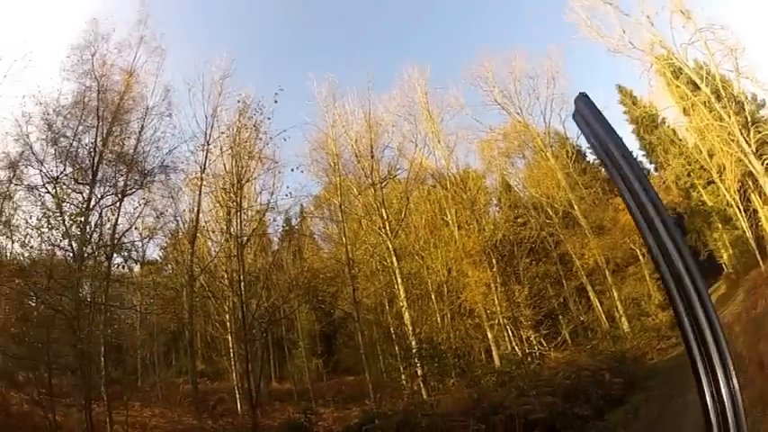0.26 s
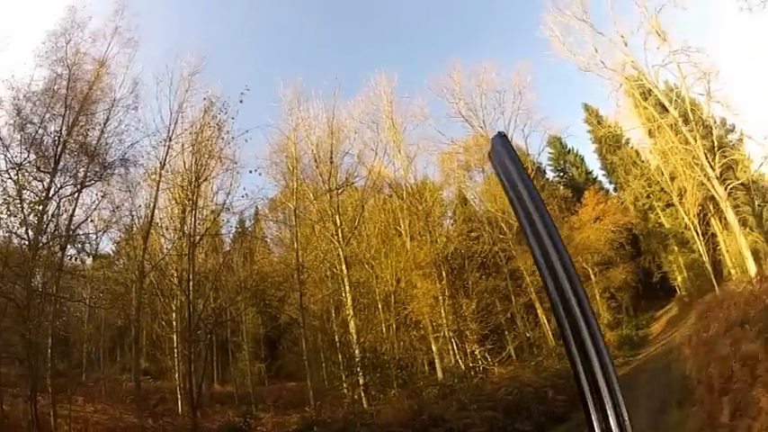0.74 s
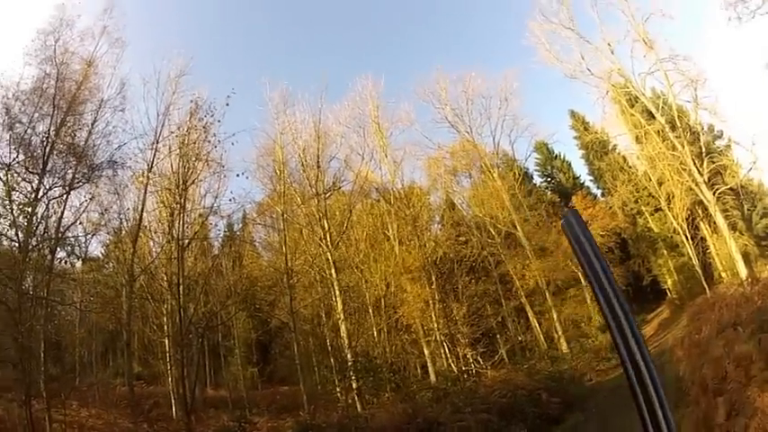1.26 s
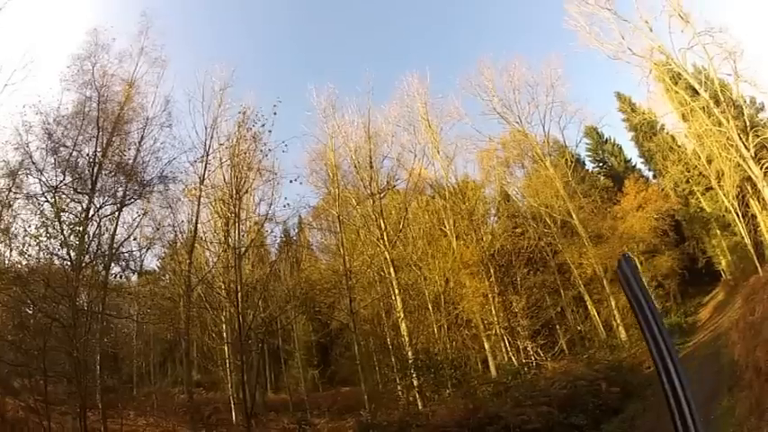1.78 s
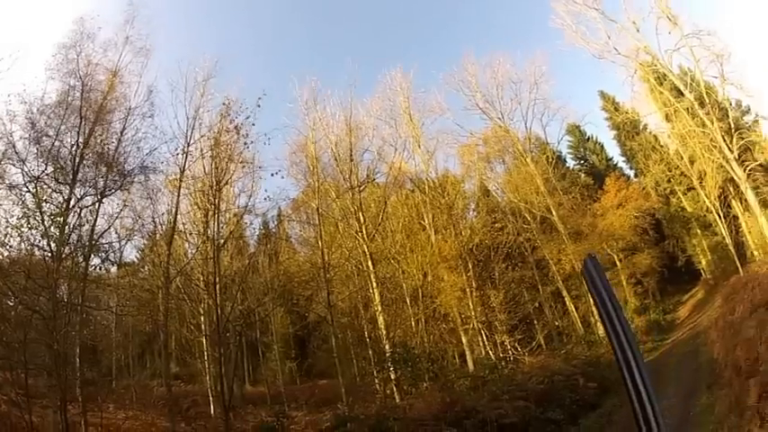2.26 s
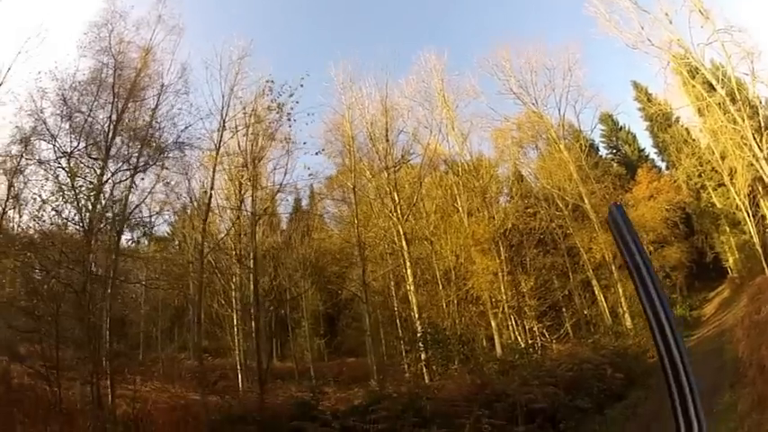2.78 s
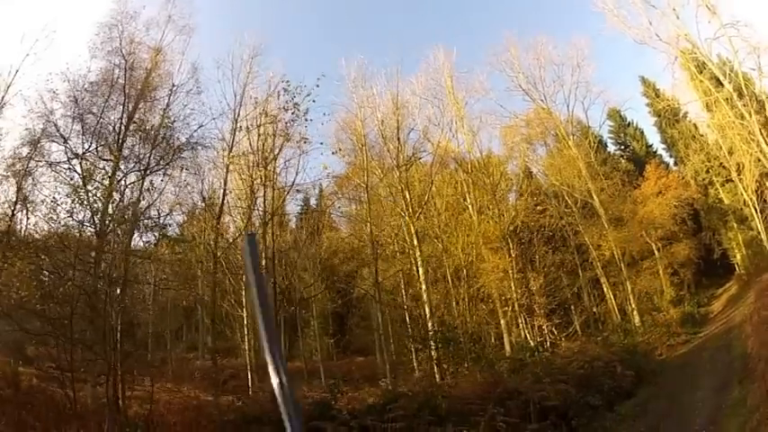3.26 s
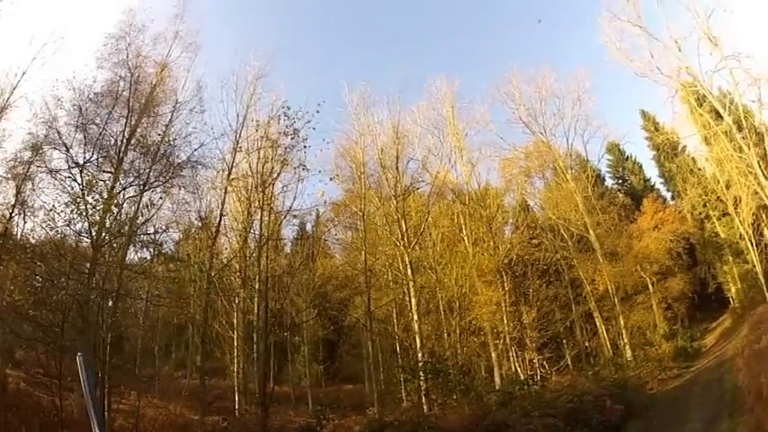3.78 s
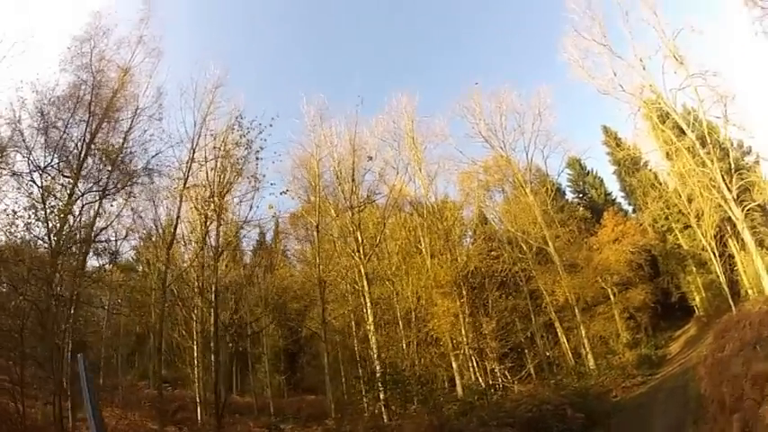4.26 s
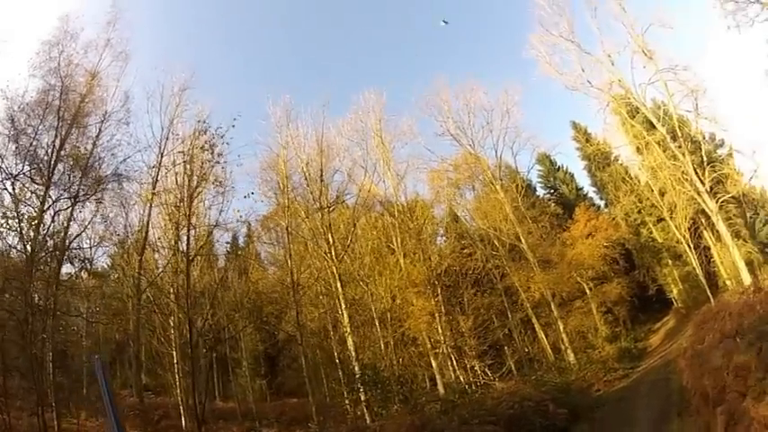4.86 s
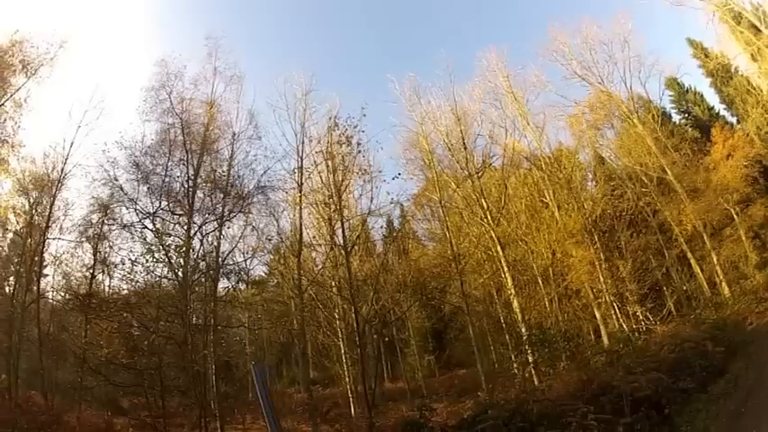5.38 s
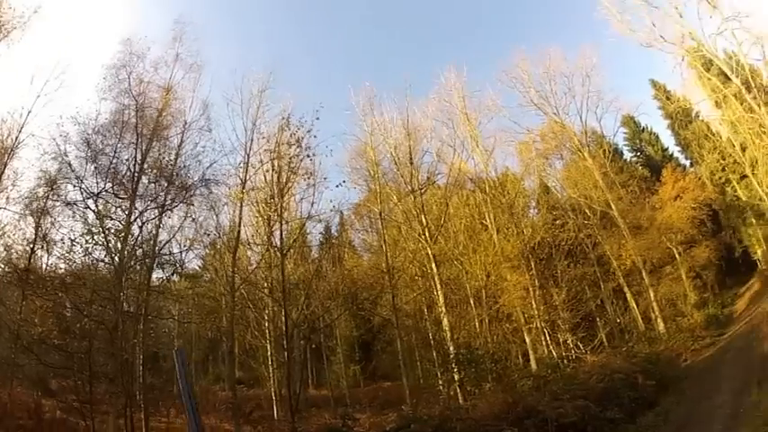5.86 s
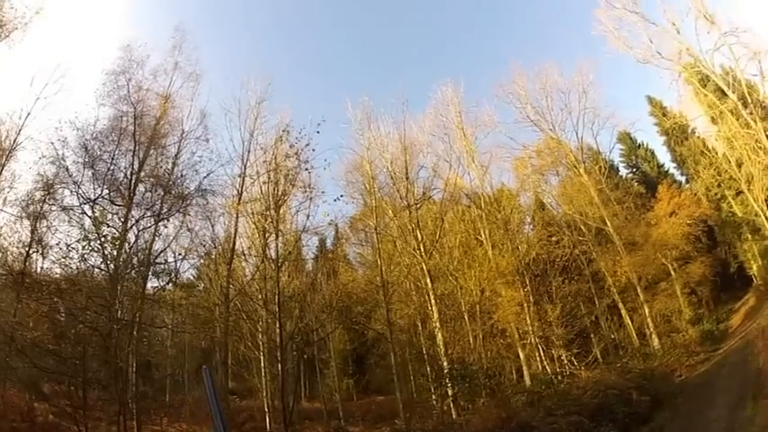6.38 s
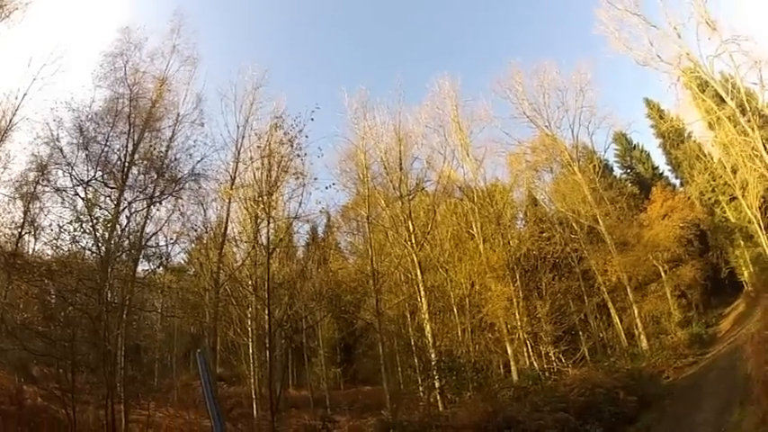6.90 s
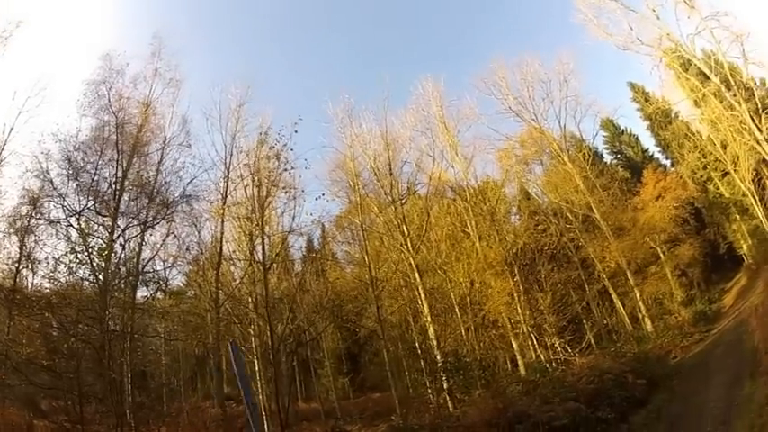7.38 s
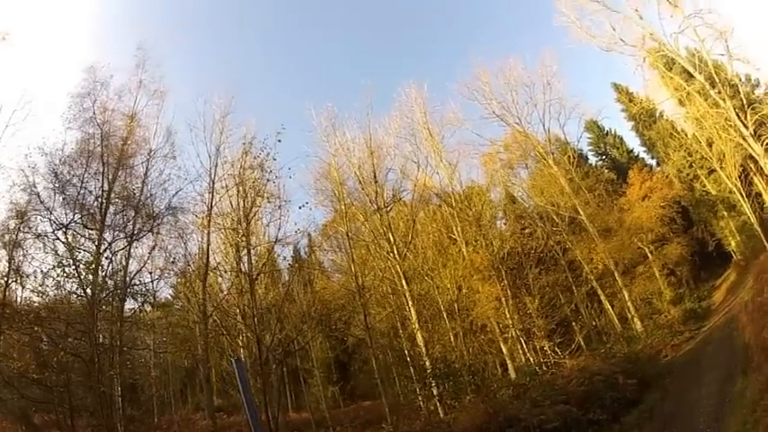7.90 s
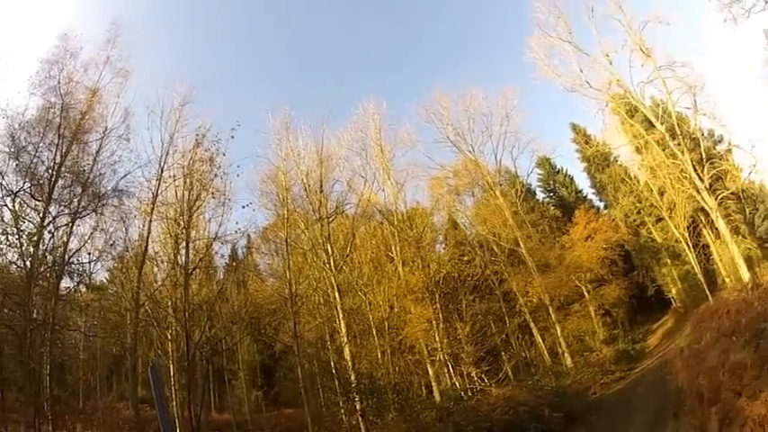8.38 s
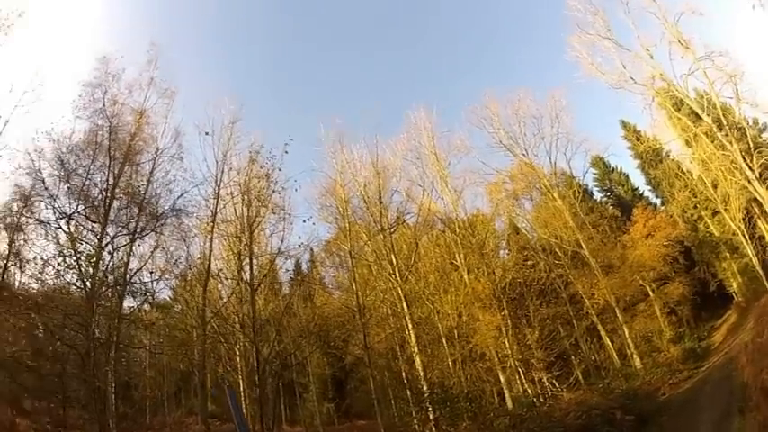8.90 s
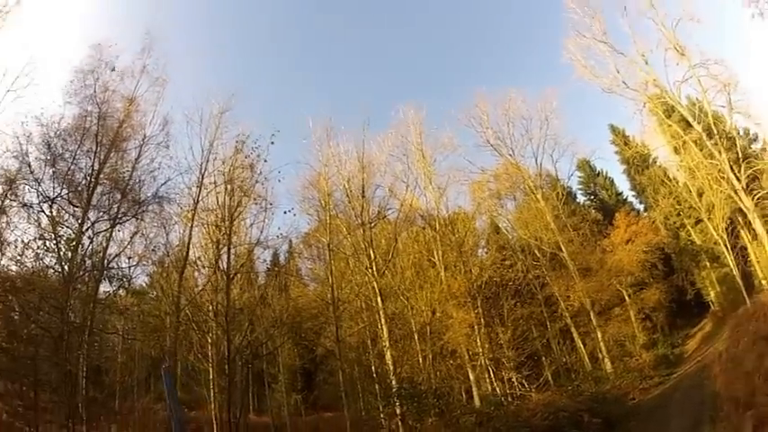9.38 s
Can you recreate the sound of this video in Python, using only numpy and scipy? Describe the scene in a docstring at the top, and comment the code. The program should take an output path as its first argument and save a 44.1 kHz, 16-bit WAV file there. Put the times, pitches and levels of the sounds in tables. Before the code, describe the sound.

Still woodland air, a low soft bed with slight hiss, nearly mono through a small cased camera on the shooter. Faint gun clicks from 0.7 to 1.5 s, with light cloth rustle. From 1.3 to 2.5 s a flushed pheasant gives eight raspy, resonant cackles, with a few faint distant birds. At 2.5 s a very close shotgun blast overloads the microphone: hard crack, boxy boom, short thump. A second follows at 3.2 s. Each throws a swelling scatter of echoes from trunks, then a low roll surging in patches and fading over several seconds. Harsh short clucks run from 4.1 to 6.4 s, with a brief wind bump at 4.6. Hard, ringing steel clicks open the gun around 6.0 and 6.2 s. Afterwards come tiny clicks, soft gusts at 7.5 and 9.0, rustling, and sparse far chirps and hoarse calls until about 9.7 s.

```python
"""Gun handled with small clicks; a pheasant cackles as it is flushed: uneven pulses and rasp in a resonant throat.
Two shotgun blasts overload a small cased camera: crack, boom and thump, then tree scatter and a long roll.
The bird clucks on in flight; the gun is opened with hard clicks: noise snaps over ringing steel modes.
Throughout: far birds as gliding sines, woodland air, wind gusts on the case and rustling clothes as shaped noise."""
import sys
import numpy as np
from scipy import signal
from scipy.fft import rfft, irfft, next_fast_len
from scipy.io import wavfile
from scipy.ndimage import uniform_filter1d

SR = 44100
rng = np.random.default_rng(int(sys.argv[2]) if len(sys.argv) > 2 else 0)


def write(x):
    x = np.atleast_2d(x).T
    wavfile.write(sys.argv[1], SR, np.round(np.clip(x, -1, 1) * 32767).astype(np.int16))


N = 425124
TIME = np.arange(N) / SR


def from_db(db):
    """Decibels to gain."""
    return 10 ** (np.asarray(db) / 20)


def rms_one(x):
    """Scale to unit power."""
    return x / np.sqrt(np.mean(x ** 2) + 1e-20)


def coloured(x, colour):
    """Filter by a (hz, db) curve, interpolated over log frequency; rms 1."""
    hz, db = np.transpose(colour)
    size = next_fast_len(len(x), real=True)
    bins_hz = np.maximum(np.arange(size // 2 + 1) * SR / size, 1)
    gain = from_db(np.interp(np.log(bins_hz), np.log(hz), db))
    filtered = irfft(rfft(x, size) * gain, size)
    return rms_one(filtered[:len(x)])


def band(x, low_hz, high_hz):
    """Causal band-pass."""
    edges_hz = [low_hz, min(high_hz, SR / 2 - 1000)]
    sos = signal.butter(2, edges_hz, "band", fs=SR, output="sos")
    return signal.sosfilt(sos, x + 1e-18)


def resonate(x, resonances):
    """Parallel two-pole resonances: (hz, width_hz, db)."""
    out = 0
    for hz, width_hz, db in resonances:
        radius = np.exp(-np.pi * width_hz / SR)
        poles = [1, -2 * radius * np.cos(2 * np.pi * hz / SR), radius * radius]
        peak = (1 - radius * radius) / 2 * signal.lfilter([1, 0, -1], poles, x + 1e-18)
        out = out + from_db(db) * peak
    return out


def decay(age_s, t60_s):
    """Unit envelope: starts at age 0, down 60 dB at t60."""
    return (age_s >= 0) * np.exp(-np.log(1000) * np.clip(age_s / t60_s, 0, 10))


def ring(age_s, hz, t60_s):
    """One struck mode: a decaying sine."""
    return np.sin(2 * np.pi * hz * age_s) * decay(age_s, t60_s)


def add(out, start_s, sound):
    """Mix a short sound in at start_s."""
    start = round(start_s * SR)
    out[start:start + len(sound)] += sound[:N - start]


def grains(per_s):
    """Random clicks of uneven size; rms 1."""
    return rms_one(rng.standard_normal(N) * (rng.random(N) < per_s / SR))


def swells(rows, t_s=TIME):
    """Gain of bell-shaped (centre_s, level_db, spread_s) swells whose powers add."""
    power = 0
    for centre_s, level_db, spread_s in rows:
        distance = np.minimum(abs(t_s - centre_s) / spread_s, 10)
        power = power + from_db(level_db) ** 2 * np.exp(-.5 * distance ** 2)
    return np.sqrt(power)


# shots: start_s, blast_db, boom_hz, crack_db, scatter_db, scatter_peak_delay_s, roll_db
SHOTS = [(2.4829, 4, 481, -2, -28.5, 0.22, -24), (3.1651, 4, 476, -2.5, -28, .17, -26)]
# second resonance of the camera case: mode_hz, mode_db, mode_t60_s
CASE_MODE = (840, -5, 0.016)


def blasts(boom_s=0.0038, boom_lowest_hz=230, crack_t60_s=.016, thump_hz=90, thump_db=-5, thump_t60_s=0.035,
           shudder_db=-19, shudder_t60_s=0.03):
    """The shock front cracks and sets the case booming for about two cycles, over a low thump."""
    out, age_s = np.zeros(N), TIME[:SR // 4]
    mode_hz, mode_db, mode_t60_s = CASE_MODE
    for start_s, blast_db, boom_hz, crack_db, *_ in SHOTS:
        # starts with a jump; the steep envelope cuts it off after about two cycles
        boom = np.sin(2 * np.pi * boom_hz * age_s + np.pi / 3) * np.exp(-(age_s / boom_s) ** 4)
        boom = band(from_db(blast_db) * boom, boom_lowest_hz, SR / 2)   # a small case cannot boom lower
        boom += from_db(mode_db) * ring(age_s, mode_hz, mode_t60_s)
        crack = rms_one(band(rng.standard_normal(len(age_s)), 460, 5500))
        crack *= from_db(crack_db) * decay(age_s, crack_t60_s)
        thump = from_db(thump_db) * ring(age_s, thump_hz, thump_t60_s)
        shudder = rms_one(band(rng.standard_normal(len(age_s)), 400, 1100))
        shudder *= from_db(shudder_db) * decay(age_s, shudder_t60_s)
        add(out, start_s, crack - boom + thump + shudder)
    return out


# scatter off trunks and twigs: hz, density_db (per Hz), extra_loss_db_per_s, first_echo_db
SCATTER = [(34.33, -3, -1.5, -10), (110, 12, 3.5, -17.5), (178, 1, 0.5, -26.5), (400, -14, -2.5, -3),
           (794, 0, -5.5, -8), (1120, 2, -5, -10), (1280, -6.5, -1.5, -4.5), (1690, -6, -2.5, -1),
           (2810, -6.5, 5, -3.5), (3400, -9, 3, -7), (4830, -13.5, 13, -0.5), (5940, -11, 15.5, -5.5)]
# resonances as the muzzle swings, one list a shot: hz, width_hz, peak_db
SCATTER_PEAKS = [
    [(1650, 100, 6), (2130, 290, 4), (2710, 340, -1), (3150, 150, -6), (3920, 220, -7.5), (4370, 210, -8.5)],
    [(1020, 340, -10.5), (1535, 71, 3), (2080, 140, 6), (2490, 220, 3.5), (3010, 54, 11.5), (4540, 260, -2)],
]


def scatter(echoes_per_s=8000, peaks_db=4.0, crest_db=1.0, hold_s=0.41, loss_db_per_decade=54):
    """Thousands of small echoes swell as the blast reaches the tree line; longer paths lose their treble."""
    hz, density_db, loss_db_per_s, first_db = np.transpose(SCATTER)
    edges_hz = np.geomspace(30, 7680, 17)
    out, age_s = np.zeros(N), TIME[:4 * SR]
    for (start_s, _, _, _, scatter_db, peak_s, _), peaks in zip(SHOTS, SCATTER_PEAKS):
        echoes = rfft(coloured(grains(echoes_per_s)[:len(age_s)], np.c_[hz, density_db]))
        bins_hz = np.arange(len(echoes)) * SR / len(age_s)
        # past the crest the level falls with path length
        fade_db = loss_db_per_decade * np.log10(1 + np.maximum(age_s - peak_s, 0) / hold_s)
        tail = 0
        for low_hz, high_hz in zip(edges_hz, edges_hz[1:]):
            centre_hz = np.sqrt(low_hz * high_hz)
            rise_db = np.interp(age_s, [0, peak_s], [np.interp(centre_hz, hz, first_db), crest_db])
            loss_db = np.interp(centre_hz, hz, loss_db_per_s) * np.minimum(age_s - peak_s, 1)
            band_echoes = irfft(echoes * (bins_hz >= low_hz) * (bins_hz < high_hz))
            tail = tail + from_db(scatter_db + rise_db - fade_db - loss_db) * band_echoes
        add(out, start_s, tail + from_db(peaks_db) * resonate(tail, peaks))
    return out


# colour of the roll: hz, level_db
ROLL_COLOUR = [(120, -34.5), (215, -13), (280, -5), (380, -2), (490, 1.5), (610, 0), (680, -8),
               (750, -23.5), (850, -18), (1200, -38), (2000, -59.5)]
# stands of trees that throw every shot back: delay_s, level_db (against the roll), spread_s
STANDS = [(.05, 1.5, 0.0091), (.105, 1, 0.019), (.172, 6, 0.034), (.236, 5, 0.014), (.35, -0.5, 0.033),
          (.406, 1.5, .01), (.455, -.5, .012), (.56, -1, 0.022), (.63, -5, .025), (1.92, -20, 0.18)]


def roll(echoes_per_s=8000, evenness=0.65, rise_s=0.083, hold_s=0.42, loss_db_per_decade=35.5,
         thin_below_hz=330, bass_fill_s=0.27):
    """Low echoes merge into a long roll that deepens, and surges as each stand of trees answers."""
    out = np.zeros(N)
    # holds while the blast crosses the clearing, then falls with path length
    fade_db = loss_db_per_decade * np.log10(np.hypot(1, TIME / hold_s))
    steady = (1 - np.exp(-TIME / rise_s)) * from_db(-fade_db)
    answer = np.hypot(steady, swells(STANDS))
    thin_share = np.exp(-TIME / bass_fill_s)
    for start_s, *_, roll_db in SHOTS:
        near = coloured(grains(echoes_per_s), ROLL_COLOUR)
        far = coloured(grains(echoes_per_s), ROLL_COLOUR)
        thin = rms_one(band(near, thin_below_hz, SR / 2))
        echoes = np.sqrt(thin_share) * thin + np.sqrt(1 - thin_share) * far
        # so many paths keep the power steady
        local_power = uniform_filter1d(echoes ** 2, size=1200) + 1e-6
        echoes /= local_power ** (evenness / 2)
        add(out, start_s, from_db(roll_db) * answer * rms_one(echoes))
    return out


# clicks of the gun handled and opened: start_s, force_db
GUN_CLICKS = [(0.746, -47.5), (0.773, -51), (.968, -49.5), (1.26, -49.5), (1.366, -48), (1.526, -47),
              (4.813, -49.5), (5.267, -50), (5.484, -55), (5.961, -55), (5.9734, -29.5), (5.985, -29.5),
              (6.2058, -28.5), (6.211, -35), (6.238, -50), (7.714, -54), (7.823, -51), (8.432, -55)]
# modes of the gun's steel: hz, mode_db, t60_s
STEEL = [(2237, 2, 0.054), (4270, -4, 0.12), (4700, -17, .2)]


def gun_clicks(gain_db=-2.5, snap_t60_s=0.01, rattle_db=-11.0, rattle_t60_s=0.048, body_db=-9.0,
               hardest_ring_db=-12, ring_db_per_force_db=.8):
    """Each contact is a dry snap with a short rattle in the stock; harder ones ring the steel more."""
    out, age_s = np.zeros(N), TIME[:SR // 2]
    hardest_db = max(force_db for _, force_db in GUN_CLICKS)
    steel = sum(from_db(mode_db) * ring(age_s, hz, t60_s) for hz, mode_db, t60_s in STEEL)
    envelope = decay(age_s, snap_t60_s) + from_db(rattle_db) * decay(age_s, rattle_t60_s)
    for start_s, force_db in GUN_CLICKS:
        ring_db = hardest_ring_db + ring_db_per_force_db * (force_db - hardest_db)
        contact = rng.standard_normal(len(age_s))
        snap = rms_one(band(contact, 1900, 5000))
        snap += from_db(body_db) * rms_one(band(contact, 550, 1930))
        add(out, start_s, from_db(force_db + gain_db) * (snap * envelope + from_db(ring_db) * steel))
    return out


# the pheasant's throat: hz (before variety), width_hz, peak_db
THROAT = [(860, 200, 2.5), (1020, 71, 0), (2100, 260, -1), (3110, 99, -1.5), (3793, 120, 2.5),
          (4600, 250, -14)]


def pheasant(notes, gain_db, pitch_hz, rasp, trees_db, trees_t60_s, jitter=0.64, arch=0.1, variety=0.046):
    """Arched pitch drives uneven pulses and rasp through the throat; a noise tail dies away among the trees."""
    out, age_s = np.zeros(N), TIME[:SR // 2]
    for start_s, level_db, length_s in notes:
        waver, hiss, echo = rng.standard_normal((3, len(age_s)))
        along = np.minimum(age_s / length_s, 1)
        swell = np.sin(np.pi * along)
        hz = pitch_hz * (1 + arch * (swell - 1) + jitter * uniform_filter1d(waver, size=100))
        pulses = rms_one(np.diff(np.floor(np.cumsum(hz) / SR), prepend=0))
        trail = from_db(trees_db) * along * decay(age_s, trees_t60_s)
        note = swell * rms_one(pulses + rasp * hiss) + trail * echo
        # the beak opens a little differently each time
        throat = [(hz * (1 + variety * rng.uniform(-1.5, 1)), width_hz, peak_db)
                  for hz, width_hz, peak_db in THROAT]
        add(out, start_s, from_db(level_db + gain_db) * resonate(note, throat))
    return out


# cackle of the rising bird: start_s, level_db (before gain_db)
CACKLE = [(1.28, -55), (1.408, -49), (1.545, -50), (1.714, -51.5), (1.877, -51.5), (2.034, -50),
          (2.206, -51), (2.415, -48.5)]


def cackle(note_s=.083):
    """Drawn-out notes at the higher pitch."""
    notes = [(start_s, level_db, note_s) for start_s, level_db in CACKLE]
    return pheasant(notes, gain_db=3.0, pitch_hz=1057, rasp=1.0, trees_db=2.5, trees_t60_s=0.69)


# clucks in flight: start_s, level_db (before gain_db), length_s
CLUCKS = [(4.089, -48, 0.026), (4.132, -54, 0.044), (4.314, -54, .029), (4.42, -53, 0.029),
          (4.656, -52, 0.031), (4.842, -51.5, 0.017), (4.995, -53, .02), (5.085, -54, 0.057),
          (5.183, -54, 0.037), (5.377, -53, 0.046), (5.494, -52.5, 0.053), (5.742, -52.5, .022),
          (5.858, -57, .024), (6.062, -53, 0.028), (6.266, -49, 0.033), (6.408, -49, 0.046)]


def clucks():
    """Short, harsh notes at the lower pitch."""
    return pheasant(CLUCKS, gain_db=10.0, pitch_hz=796, rasp=1.0, trees_db=-7.5, trees_t60_s=0.98)


# far birds: start_s, length_s, first_hz, last_hz, level_db, hoarseness (share of pitch)
BIRDS = [(1.253, 0.25, 970, 926, -59.5, 0.019), (1.334, .3, 3200, 3330, -66.5, 0.0086),
         (2.081, 0.046, 790, 907, -52, 0.061), (2.177, 0.06, 677, 896, -48, 0.087),
         (2.335, 0.11, 3200, 3330, -66, 0.0061), (4.084, 0.51, 5560, 5680, -67, 0.01),
         (5.1, 0.46, 5370, 5700, -68, .012), (7.752, .045, 2250, 2330, -62, 0.02),
         (8.199, 0.84, 1220, 1194, -72.5, 0.038), (8.55, .1, 4940, 4700, -70, .005),
         (8.621, 0.26, 778, 660, -59.5, 0.027), (9.009, 0.065, 2940, 3420, -59, 0.011),
         (9.146, 0.1, 680, 678, -57, .01), (9.392, 0.04, 3100, 3050, -62, 0.0083),
         (9.503, 0.167, 1980, 2070, -68, .02), (9.533, 0.17, 2690, 2830, -61, 0.063)]


def birds():
    """Short gliding sines from far off; the hoarse ones waver quickly in pitch."""
    out = np.zeros(N)
    for start_s, length_s, first_hz, last_hz, level_db, hoarseness in BIRDS:
        along = np.linspace(0, 1, int(length_s * SR))
        waver = rms_one(uniform_filter1d(rng.standard_normal(SR), size=200))[:len(along)]
        hz = (first_hz + (last_hz - first_hz) * along) * (1 + hoarseness * waver)
        tone = np.sin(2 * np.pi * np.cumsum(hz) / SR)
        add(out, start_s, from_db(level_db) * np.sin(np.pi * along) * tone)
    return out


# the shooter moves: centre_s, level_db, spread_s
MOVES = [(.77, -64, 0.035), (1.9, -65.5, 0.37), (6.25, -66, 0.39), (7.82, -68.5, 0.17), (8.9, -69, .2),
         (9.63, -61, .04)]
# rustle: hz, level_db
RUSTLE_COLOUR = [(300, -11.5), (1000, 1.5), (1500, -11), (2200, 0), (3000, 1.5), (4000, -14.5), (6000, -9)]


def clothes(still_db=-80.5, grains_per_s=2500):
    """Cloth rustles as coloured grains that swell with each move."""
    return np.hypot(from_db(still_db), swells(MOVES)) * coloured(grains(grains_per_s), RUSTLE_COLOUR)


# gusts on the case: centre_s, level_db, spread_s
GUSTS = [(4.56, -47.5, 0.031), (7.49, -52.5, 0.097), (9.01, -46.5, 0.1)]
# wind: hz, level_db
GUST_COLOUR = [(20, -8.5), (50, 4.5), (90, -7.5), (160, -7.5), (300, -21.5), (900, -32), (3000, -51)]


def wind(breeze_db=-67):
    """Low noise of air brushing the case: a steady breeze with brief gusts."""
    return np.hypot(from_db(breeze_db), swells(GUSTS)) * coloured(rng.standard_normal(N), GUST_COLOUR)


# still air of the wood: hz, density_db (per Hz)
AIR = [(15, -31.5), (25, -3.5), (69, 2), (103, -6), (123, -8), (194, -5.5), (355, -7.5), (398, -9.5),
       (609, -11), (730, -16), (1050, -28), (2300, -29.5), (5400, -34.5), (7020, -61.5), (11900, -120)]


def air(level_db=-53):
    """Steady coloured noise of the still wood."""
    return from_db(level_db) * coloured(rng.standard_normal(N), AIR)


# hiss in which the two microphones differ: hz, density_db (per Hz)
MIC_HISS = [(15, -40), (25, -1.5), (207, 0.5), (487, -13.5), (652, -15), (1430, -14.5), (4510, -13.5),
            (5400, -10.5), (7020, -49.5), (11900, -120)]


def mic_hiss(level_db=-80.0):
    """Steady hiss, opposite in sign on the two channels."""
    side = from_db(level_db) * coloured(rng.standard_normal(N), MIC_HISS)
    return side * np.array([[1], [-1]])


def scene():
    """All sources alike on both channels, plus the microphone hiss: almost mono."""
    gun = blasts() + scatter() + roll() + gun_clicks()
    bird_calls = cackle() + clucks() + birds()
    background = clothes() + wind() + air()
    return gun + bird_calls + background + mic_hiss()


def record(dry, treble_burst_db=-4.5, broad_burst_db=-15.0, cutoff_hz=16600):
    """The input overloads and clips; samples held at 12 kHz mirror the sound into the treble."""
    lowpass = signal.butter(10, 5250, fs=SR, output="sos")
    narrow = signal.sosfilt(lowpass, np.clip(dry, -1, 1))
    at_12_khz = signal.resample_poly(narrow, 160, 147, axis=1)[:, ::4]   # 48 kHz, every fourth sample
    steps = np.repeat(at_12_khz, 4, axis=1)
    held = signal.resample_poly(steps, 147, 160, axis=1)[:, :N]
    held = signal.sosfilt(signal.ellip(10, .2, 70, 15300, fs=SR, output="sos"), held)
    # noise bursts near 15 kHz where the blast swings most negative
    treble = from_db(treble_burst_db) * rms_one(band(rng.standard_normal(N), 14200, 15700))
    # broadband noise, drawn separately for each channel
    broad = from_db(broad_burst_db) * rms_one(band(rng.standard_normal((2, N)), 100, 20000))
    clipped = np.clip(held + (dry < -.8) * (treble + broad), -1, 1)
    return signal.sosfilt(signal.ellip(12, .1, 90, cutoff_hz, fs=SR, output="sos"), 0.95 * clipped)


dry = scene()
out = record(dry)
write(out)
```